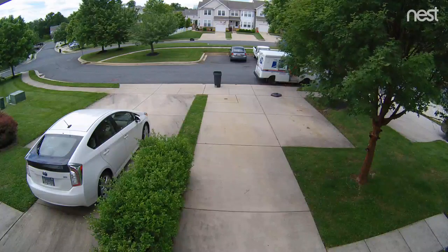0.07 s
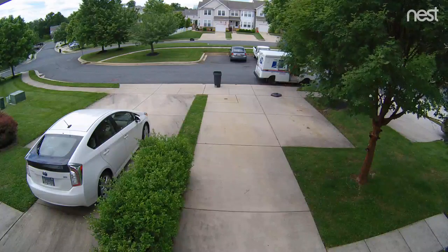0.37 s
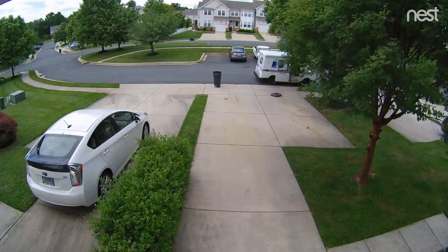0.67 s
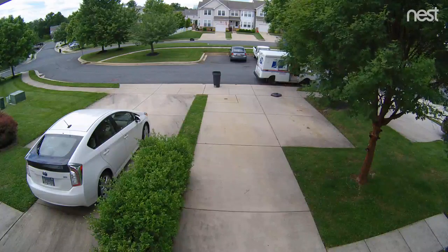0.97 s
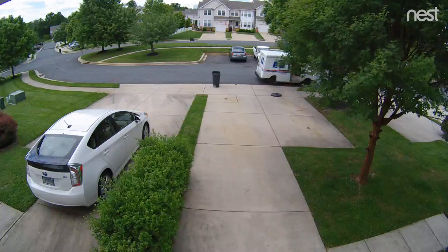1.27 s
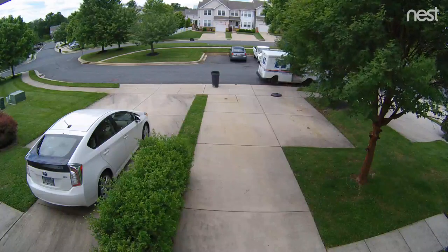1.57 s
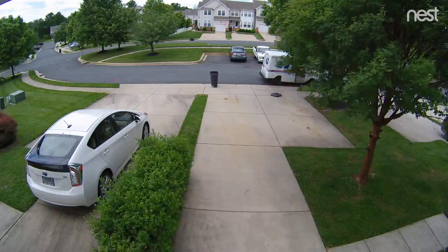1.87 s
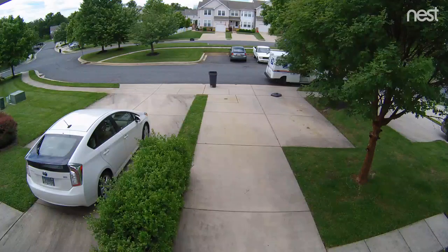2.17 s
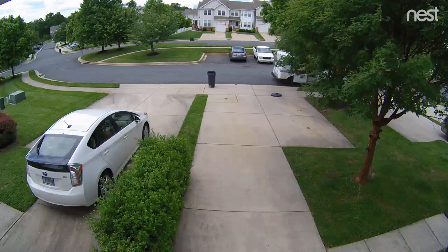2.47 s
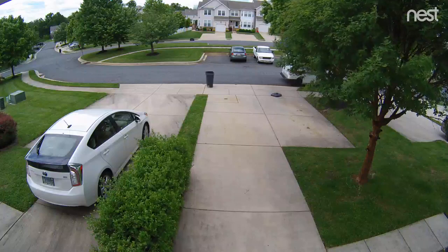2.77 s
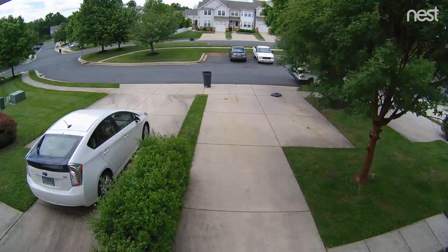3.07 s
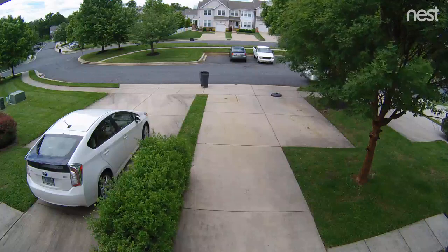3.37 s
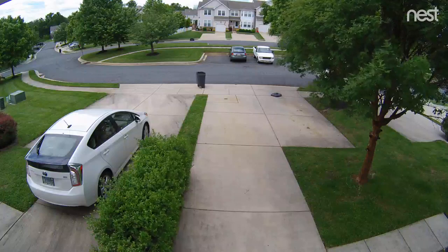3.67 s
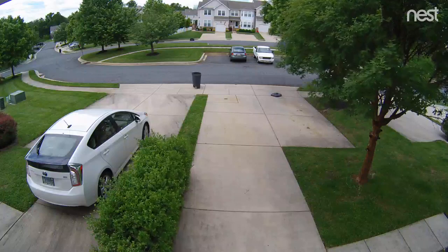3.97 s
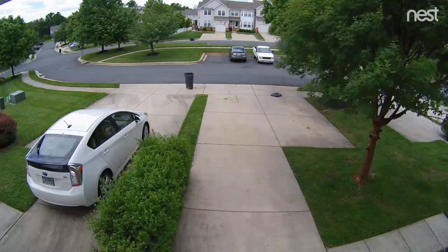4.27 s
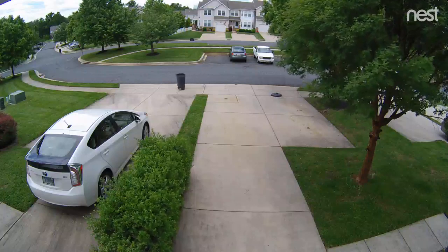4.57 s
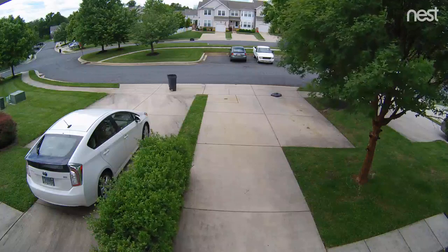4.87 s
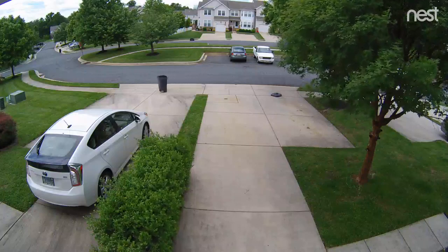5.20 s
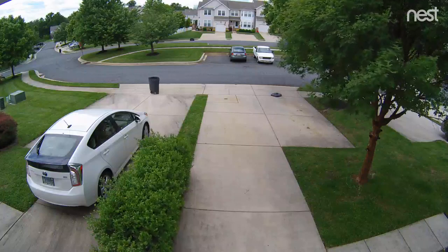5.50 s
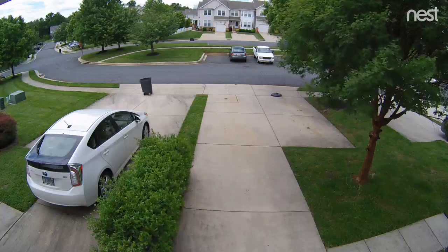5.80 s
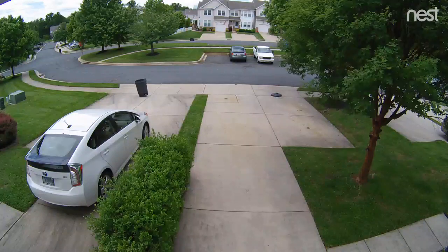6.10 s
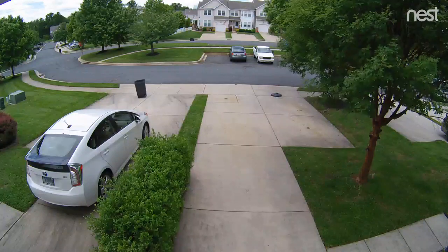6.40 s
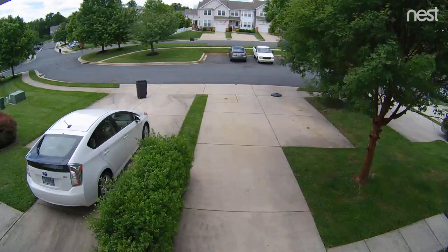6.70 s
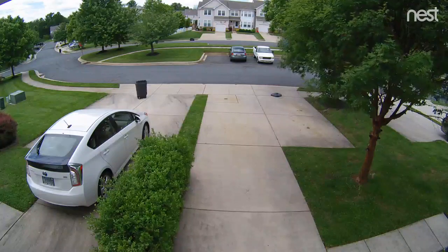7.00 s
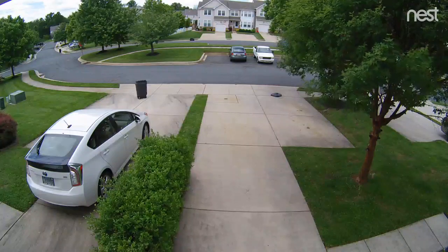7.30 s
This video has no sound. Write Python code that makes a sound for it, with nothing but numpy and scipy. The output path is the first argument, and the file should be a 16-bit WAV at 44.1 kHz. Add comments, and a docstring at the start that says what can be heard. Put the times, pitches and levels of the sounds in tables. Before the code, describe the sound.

On a suburban street, tyres and leaves make a steady rush and hiss. A small van idles, then pulls away with a rising drone and a ticking, spitting exhaust. A gust swells and briefly buffets the microphone of a house camera. Some way off, an empty wheeled plastic bin rolls over a concrete driveway, scraping, bumping and clacking with a slightly hollow sound, as the wind eases and the van fades.

```python
"""Van, gust and rolling bin

A small delivery van pulls away down a suburban street. The firings of its four-cylinder engine make
the exhaust tick and drone over a steady rush of tyres and leaves. A gust buffets the microphone of a
house camera and pushes an empty wheeled plastic bin across a concrete driveway some twenty metres off.
The bin rolls, scrapes and rattles: each bump rings its hard parts and booms in its hollow body."""
import sys
import numpy as np
from scipy import signal
from scipy.fft import rfft, irfft
from scipy.io import wavfile
from scipy.ndimage import uniform_filter1d

SR = 44100
rng = np.random.default_rng(int(sys.argv[2]) if len(sys.argv) > 2 else 0)


def materialize(psi):
    """Save the field psi as 16-bit PCM at rate SR to the path in sys.argv[1].

    A 1-D psi becomes a single channel; in a 2-D psi each row is a channel.
    """
    bounded = np.clip(np.atleast_2d(psi).T, -1, 1)
    quanta = np.round(bounded * 32767).astype(np.int16)
    wavfile.write(sys.argv[1], SR, quanta)


N = 328545

# tone of the low roar of tyres and air: f/Hz, level/dB
ROAR_COLOUR = [(15, -36.5), (30, -15.5), (55, -5), (150, -7.5), (220, -2.5), (310, 0), (500, 1), (760, 1.5),
               (1100, -0.5), (1500, -7), (2200, -9.5), (2900, -24.5), (4800, -68)]
# a broad swell of wind and a short gust near its top: t/s of the crest, half-width/s, level/dB
WIND_SWELLS = [(4.96, 0.96, -57.5), (4.7, 0.052, -47)]
# tone of the wind's thudding and of the tailpipe's rumble: f/Hz, level/dB
RUMBLE_COLOUR = [(15, -34.5), (35, -3.5), (65, -4), (150, -2), (300, 0), (600, -10.5), (2000, -44)]
# tone of the hiss of tyres and leaves, and of the grit under the bin: f/Hz, level/dB
HISS_COLOUR = [(820, -49.5), (1400, -16), (1900, -10.5), (2490, -6.5), (2850, -4.5), (3550, -.5),
               (4070, -1), (4420, 0), (4820, -2.5), (5310, -10), (6180, -21.5), (7180, -35), (9330, -73)]
# how the hiss rises and falls: t/s, relative level/dB
HISS_LEVEL = [(0.0, -55.5), (0.54, -59), (1.45, -58), (2.0, -53.5), (2.75, -52), (3.78, -55), (4.65, -53.5),
              (5.23, -55.5), (6.4, -60), (7.25, -61.5), (7.45, -64)]
# edges of the bands of hiss that waver separately: f/Hz
RUSTLE_EDGES_HZ = [0, 1800, 2300, 2700, 3100, 3500, 3900, 4300, 4700, 5200, 5800, 9000]
# swirls of wind hitting the microphone: t/s, length/s, level/dB, upper edge f/Hz
BUFFETS = [(4.515, 0.023, -42, 880), (4.594, 0.0102, -37, 1020), (4.645, .012, -41.5, 1150),
           (4.681, .033, -32.5, 920), (4.715, 0.028, -32.5, 1420), (4.749, .016, -55, 1200),
           (4.81, .011, -47.5, 750), (4.98, .011, -37.5, 840), (4.995, 0.019, -36, 1100),
           (5.016, 0.047, -48.5, 1130), (5.083, 0.0085, -43, 856), (5.228, 0.0068, -46, 710),
           (5.669, 0.018, -57, 450), (7.321, 0.013, -59.5, 410), (7.383, 0.0134, -70, 380)]
# tone of those swirls: f/Hz, level/dB
BUFFET_COLOUR = [(60, -47), (120, -22), (220, -5.5), (320, -3.5), (415, 2.5), (500, 0.5), (620, -2.5),
                 (740, -4), (950, -7), (1320, -8), (2500, -17.5)]

# the van idles, pulls away and eases off: t/s, firing rate/Hz
FIRING_RATE = [(0, 28), (1.3, 29), (1.8, 43), (2.2, 51), (2.6, 55.6), (3.6, 59.2), (3.95, 61.2),
               (4.6, 66.3), (5.2, 62), (5.5, 60.3), (6.2, 61.4), (7.45, 60.4)]
# low tones of the engine's boom: multiple of the firing rate, level/dB
BOOM_TONES = [(2, -12), (4, -4), (10, -6)]
# tones of the engine's whirr: multiple of the firing rate, level/dB
WHIRR_TONES = [(3, -12), (5, -6), (6, -6.5), (7, -4), (13, -18)]
# how the whirr rises and falls: t/s, level/dB
WHIRR_LEVEL = [(0, -94), (3.4, -70), (3.95, -61.5), (4.5, -52.5), (5.4, -63), (6.1, -63.5), (6.8, -60),
               (6.98, -65), (7.45, -68)]
# ring of the manifold, the exhaust pipes on the engine: f/Hz, nominal width/Hz, level/dB
MANIFOLD_MODES = [(3629, 290, 1.5), (3116, 100, -3.5), (2680, 100, -11.5), (4500, 160, -12.5)]
# the exhaust ticks hardest under load: t/s, level/dB
TICK_LEVEL = [(0, -79), (1.6, -80), (1.73, -57.5), (2.15, -62.5), (2.42, -51.5), (2.52, -60.5), (2.65, -51),
              (2.85, -56.5), (3.2, -50.5), (3.4, -54.5), (3.9, -49.5), (4.15, -58), (4.75, -51.5),
              (5.2, -60), (5.9, -56.5), (6.5, -64), (6.8, -64.5), (7.0, -55.5), (7.45, -67)]
# sharp single spits of the exhaust: t/s, peak level/dB
SPITS = [(2.382, -38.5), (2.565, -37.5), (2.674, -36), (2.902, -39.5), (3.092, -35), (3.18, -35),
         (3.234, -34), (3.249, -34.5), (3.368, -35.5), (3.587, -36), (3.603, -37), (3.653, -34),
         (3.786, -30), (3.804, -31.5), (3.819, -32.5), (3.837, -33), (3.869, -31), (3.967, -34),
         (3.984, -36.5)]

# ring of the bin's lid, axle and wheels: f/Hz, nominal width/Hz, level/dB
BIN_HARD_MODES = [(2155, 190, -4), (2460, 170, 1.5), (2620, 200, 4.5), (2983, 420, -4.5), (3504, 340, 2.5),
                  (4520, 510, -0.5), (5110, 360, -5)]
# boom of its hollow body: f/Hz, nominal width/Hz, level/dB
BIN_BODY_MODES = [(198, 100, 5.5), (397, 160, 12.5), (640, 380, 11), (763, 240, 6), (1220, 1100, 4)]
# tone of the dry crack of a contact: f/Hz, level/dB
CRACK_COLOUR = [(500, -23.5), (1600, -18), (2400, 1.5), (3600, 1.5), (5000, -1), (6200, -15.5), (7200, -48)]
# bumps under the wheels: t/s, level/dB, clatter length/s, then the relative
# second wheel/dB, body boom/dB, treble tilt/dB, dry crack/dB
BUMPS = [(0.761, -49, 0.02, -3, -16, 3, -1), (1.213, -55, .064, -6, -30, 1.5, -12),
         (1.567, -59, 0.044, 1, -0.5, -2, -7), (3.922, -50.5, 0.043, -12, -22, 1, -20),
         (4.36, -49.5, 0.037, -20, -34, -5, -2), (4.629, -43, 0.044, -8, -4.5, -0.5, -13),
         (4.76, -46.5, 0.044, -3, -27, 2, -14), (5.482, -42, 0.03, -5, -13.5, -0.5, 5),
         (5.626, -51.5, 0.066, 0, -12.5, -9, -6), (5.757, -36, 0.012, -10, -13, -2, 3),
         (5.846, -48.5, 0.022, -7.5, -11, -9.5, -9), (6.254, -53, 0.031, -0.5, 0.5, -3, -1),
         (6.716, -45.5, .011, -4.5, -4, -3, -1), (6.98, -57, 0.031, -2, -25, 2.5, -3)]
# single hard clacks of the lid and axle: t/s, peak level/dB, treble tilt/dB
CLACKS = [(5.6218, -36, -9), (5.662, -38, -5), (5.7545, -34, -4), (5.7583, -28, 1), (5.766, -27.5, -0.5),
          (5.854, -38, -8), (6.717, -33.5, 1), (6.722, -43, 4), (6.7507, -37, -5), (6.8275, -39.5, -4),
          (6.8312, -36.5, -5)]
# the bin's foot drags on concrete: t/s of the hardest rub, build-up/s, dying away/s, level/dB
SCRAPES = [(5.119, 0.0046, 0.014, -42.5), (5.159, 0.016, 0.015, -40.5), (5.352, 0.026, 0.024, -42.5)]
# tone of that dragging: f/Hz, level/dB
SCRAPE_COLOUR = [(400, -22), (1700, -9), (2200, -7), (2550, 6.5), (2950, 1), (3500, 3), (4100, -0.5),
                 (5100, -1.5), (5700, -8), (6400, -39), (7300, -23.5)]

TIME = np.arange(N) / SR


def undb(db):
    """Turn decibels into a gain."""
    return 10 ** (np.asarray(db) / 20)


def unit(x):
    """Scale to an average (rms) level of 1."""
    return x / np.sqrt(np.mean(x ** 2) + 1e-30)


def curve(table):
    """Join the points of a time table with straight lines, one value per sample."""
    return np.interp(TIME, *np.transpose(table))


def add(out, s, x):
    """Mix x into out, starting s seconds in."""
    i = max(int(s * SR), 0)
    out[i:i + len(x)] += x[:max(N - i, 0)]


def waver(rate_hz):
    """Smooth random wavering with a spread near 1."""
    hold = max(int(SR / rate_hz), 1)
    steps = np.repeat(rng.standard_normal(N // hold + 1), hold)
    return unit(uniform_filter1d(uniform_filter1d(steps, hold), hold)[:N])


def colour(x, points):
    """Shape the tone of x with a curve of (f/Hz, level/dB) points."""
    hz, db = np.transpose(points)
    f = np.maximum(np.fft.rfftfreq(len(x), 1 / SR), 1)
    return irfft(rfft(x) * undb(np.interp(np.log(f), np.log(hz), db)), len(x))


def tilt(x, bright_db):
    """Brighten x by raising the treble and lowering the rest; a negative tilt dulls it."""
    return colour(x, [(2500, -bright_db), (5000, bright_db)])


def ring(x, modes):
    """Let x ring an object's modes, the pitches at which it likes to vibrate."""
    out = 0
    for hz, width, db in modes:
        b, a = signal.iirpeak(hz, hz / (0.8 * width), fs=SR)
        out = out + undb(db) * signal.lfilter(b, a, signal.lfilter(b, a, x))  # twice, for steep sides
    return out


def puffs(pulses, decay_s):
    """Turn each pulse into a quickly fading puff of noise."""
    return rng.standard_normal(N) * signal.lfilter([1], [1, -np.exp(-1 / (decay_s * SR))], pulses)


def street_echo(x, echo_db, decay_s=.2):
    """Add the scattered echo of house fronts, cars and trees."""
    t = np.arange(SR // 2) / SR
    tail = rng.standard_normal(len(t)) * undb(-60 * t / decay_s) * (1 - np.exp(-t / 0.002))
    return x + undb(echo_db) * signal.fftconvolve(x, tail / np.linalg.norm(tail))[:N]


def roar(calm_db=-66.5, flutter_db=1.86, gust_flutter_db=-5.0, thud_db=-55.5):
    """Tyres and air roar and swell with the wind, whose low thudding grows faster than the roar."""
    swell_power = sum(undb(db) ** 2 / (1 + ((TIME - s) / width) ** 2) for s, width, db in WIND_SWELLS)
    wind = np.sqrt(undb(calm_db) ** 2 + swell_power)
    gust = wind / wind.max()
    flutter = undb((flutter_db + gust_flutter_db * gust) * waver(70))
    air = unit(colour(rng.standard_normal(N), ROAR_COLOUR)) * wind * flutter
    thud = unit(colour(rng.standard_normal(N), RUMBLE_COLOUR) * undb(0.5 * waver(60)))
    return air + thud * undb(thud_db) * gust ** 1.5


def hiss(grain_db=0.64, rustle_db=1.8, gain_db=4):
    """Tyres and leaves make a grainy hiss, which rustles as each band wavers on its own."""
    grains = rng.standard_normal(N) * undb(grain_db * waver(640))
    spectrum, hz = rfft(colour(grains, HISS_COLOUR)), np.fft.rfftfreq(N, 1 / SR)
    rustle = np.zeros(N)
    for low, high in zip(RUSTLE_EDGES_HZ, RUSTLE_EDGES_HZ[1:]):
        band = irfft(spectrum * ((hz >= low) & (hz < high)), N)
        rustle += band * undb(rustle_db * waver(30))
    return unit(rustle) * undb(curve(HISS_LEVEL) + gain_db)


def buffets(fade_share=0.15, low_cut_hz=100):
    """Swirls of air hit the microphone: dry, dull bursts that stop as suddenly as they start."""
    out = np.zeros(N)
    air = colour(rng.standard_normal(N), BUFFET_COLOUR)
    for s, length, db, top_hz in BUFFETS:
        i, n = int(s * SR), int(length * SR)
        low_pass = signal.butter(6, top_hz, fs=SR, output="sos")
        swirl = signal.sosfilt(low_pass, air[i - SR // 20:i + n])[-n:]  # a run-up settles the filter
        add(out, s, undb(db) * unit(swirl * signal.windows.tukey(n, fade_share)))
    return signal.sosfilt(signal.butter(1, low_cut_hz, "high", fs=SR, output="sos"), out)


def engine_drone(firing_hz, cycles, cruise_hz=61, pipe_firing_hz=55, pipe_width_hz=2.4, waver_db=3.5):
    """Engine and tailpipe hum at multiples of the firing rate, over a low rumble."""
    # the tailpipe sings out as the engine climbs through one firing rate
    singing = 1 / (1 + ((firing_hz - pipe_firing_hz) / pipe_width_hz) ** 2)
    boom_db = -70.5 + 0.64 * (firing_hz - cruise_hz)  # faster firing booms louder
    out = unit(colour(rng.standard_normal(N), RUMBLE_COLOUR)) * undb(boom_db + 10.5 * singing)
    for tones, level_db in ((BOOM_TONES, boom_db + 15.5 * singing), (WHIRR_TONES, curve(WHIRR_LEVEL))):
        for multiple, db in tones:
            gain = undb(level_db + db + waver_db * waver(25))
            phase = 2 * np.pi * (multiple * cycles + rng.random())
            blur = .6 * waver(30)  # shifting echoes from the street blur each tone
            out += gain * np.sin(phase + blur)
    return out


def exhaust_ticks(cycles, scatter_db=-0.8, gas_share=0.75, surge_db=-1.9, spit_gap_s=.009):
    """Each firing rings the manifold with a crack and a puff of gas; some spit sharply instead."""
    firings = np.flatnonzero(np.diff(cycles.astype(int)))
    pulses = np.zeros(N)
    pulses[firings] = undb(scatter_db * np.clip(rng.standard_normal(len(firings)), -2, 2))
    for s, _ in SPITS:  # a spit takes the place of the ticks close to it
        pulses[int((s - spit_gap_s) * SR):int((s + spit_gap_s) * SR)] = 0
    gas = puffs(pulses, decay_s=.0022)  # gives each tick its own tone
    out = unit(ring(unit(pulses) + gas_share * unit(gas), MANIFOLD_MODES))
    out *= undb(curve(TICK_LEVEL) + surge_db * waver(12))
    spit = ring(signal.unit_impulse(SR // 50), MANIFOLD_MODES)
    for s, db in SPITS:
        add(out, s, undb(db) * spit / np.abs(spit).max())
    return out


def turn_away(ticks, middle_s=2.85, length_s=0.76, drop_hz=179.7, scatter_hz=48):
    """The ticks' ring starts high and sinks as the van turns away; no two have quite the same pitch."""
    turn_left = np.clip(.5 - (TIME - middle_s) / length_s, 0, 1)
    shift_hz = drop_hz * turn_left + scatter_hz * waver(60)
    # slide every frequency by shift_hz
    return np.real(signal.hilbert(ticks) * np.exp(2j * np.pi * np.cumsum(shift_hz) / SR))


def van(unevenness=.012, bend_s=6.9, fade_db_per_s=43):
    """Slightly uneven firings drive the drone and the ticks, which fade once the van rounds the bend."""
    firing_hz = curve(FIRING_RATE)
    cycles = np.cumsum(firing_hz * (1 + unevenness * waver(50))) / SR  # goes up by one per firing
    drone = engine_drone(firing_hz, cycles)
    ticks = turn_away(exhaust_ticks(cycles))
    fade = undb(-fade_db_per_s * np.maximum(TIME - bend_s, 0))
    return fade * (drone + street_echo(ticks, echo_db=-9))


def grit(start_s=1.5, end_s=6.9, grains_per_s=300, level_db=-60, spread_db=-1.5, patchy_db=3.0):
    """Grit cracks under the wheels in uneven patches, loudest when the bin rolls fastest."""
    progress = np.clip((TIME - start_s) / (end_s - start_s), 0, 1)
    speed = np.sqrt(np.abs(np.sin(np.pi * progress)))
    hits = rng.random(N) < grains_per_s / SR
    grains = hits * undb(spread_db * np.minimum(rng.exponential(size=N), 2))
    crunch = puffs(grains, decay_s=.0007) * speed * undb(patchy_db * waver(11))
    return undb(level_db) * unit(colour(crunch, HISS_COLOUR))


def scrapes(grain_db=1.5):
    """Plastic drags on rough concrete: a bright, grainy rasp that swells and lets go."""
    pressure = np.zeros(N)
    for s, rise, fall, db in SCRAPES:
        width = np.where(TIME < s, rise, fall)
        pressure += undb(db) * np.exp(-((TIME - s) / width) ** 2 / 2)
    rasp = rng.standard_normal(N) * undb(grain_db * waver(500))
    return pressure * unit(colour(rasp, SCRAPE_COLOUR))


def squeak(length_s=.09, pitch_hz=3350, waver_hz=130, rough_db=3, level_db=-59):
    """The dry axle sticks and slips: a hoarse, unsteady note that swells and fades."""
    n = int(length_s * SR)
    phase = 2 * np.pi * np.cumsum(pitch_hz + waver_hz * waver(600)[:n]) / SR
    note = np.sin(phase) * undb(rough_db * waver(150)[:n]) * signal.windows.hann(n)
    return undb(level_db) * unit(note)


def clatter(length_s, boom_db, bright_db, crack_db, grain_db=1.5, rise_s=0.00085, release_s=.008):
    """A quick run of small contacts that ring the bin's hard parts and boom in its hollow body."""
    t = np.arange(SR // 5) / SR
    strength, ring_noise, crack_noise = rng.standard_normal((3, len(t)))
    # each contact lasts about a millisecond and has its own force
    force = undb(grain_db * np.repeat(strength, SR // 1000)[:len(t)])
    force *= (1 - np.exp(-t / rise_s)) * np.exp(-np.maximum(t - length_s, 0) / release_s)
    ringing = unit(ring(force * ring_noise, BIN_HARD_MODES))
    crack = undb(crack_db) * unit(colour(force * crack_noise, CRACK_COLOUR))
    boom = undb(boom_db) * unit(ring(force * ring_noise, BIN_BODY_MODES))
    return np.sqrt(length_s / t[-1]) * (unit(tilt(ringing + crack, bright_db)) + boom)


def clack(bright_db, ring_db=-1, contact_s=.0005, top_hz=5600):
    """One hard contact: a dry crack and a brief ring of the bin's hard parts, with a peak of 1."""
    t = np.arange(SR // 20) / SR
    force = rng.standard_normal(len(t)) * t * np.exp(-t / contact_s)
    hit = unit(colour(force, CRACK_COLOUR)) + undb(ring_db) * unit(ring(force, BIN_HARD_MODES))
    hit = tilt(hit, bright_db) * (1 - t / t[-1])
    # roll off the top treble so the clack is not too sharp
    hit = signal.sosfilt(signal.butter(6, top_hz, fs=SR, output="sos"), hit)
    return hit / np.abs(hit).max()


def wheeled_bin(squeak_s=1.115, wheel_lag_s=.034):
    """The bin squeaks, rolls, scrapes and clacks, and clatters twice at each bump, once per wheel."""
    out = grit() + scrapes()
    add(out, squeak_s, squeak())
    for s, db, length, second_db, boom_db, bright_db, crack_db in BUMPS:
        add(out, s, undb(db) * clatter(length, boom_db, bright_db, crack_db))
        add(out, s + wheel_lag_s, undb(db + second_db) * clatter(length, boom_db, bright_db, crack_db))
    for s, db, bright_db in CLACKS:
        add(out, s, undb(db) * clack(bright_db))
    return street_echo(out, echo_db=-7)


def scene():
    """The street's roar and hiss, the bin, the gust and the van at one microphone."""
    return (roar() + hiss() + wheeled_bin() + buffets() + van())[None, :]


def record(dry, top_hz=7150):
    """The camera cuts off the high treble."""
    return signal.sosfilt(signal.ellip(8, .2, 70, top_hz, fs=SR, output="sos"), dry)


dry = scene()
out = record(dry)
materialize(out)
```